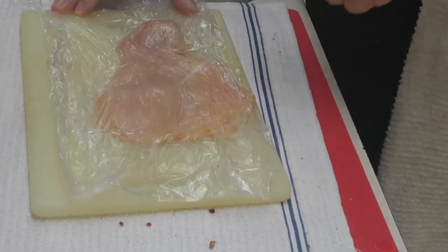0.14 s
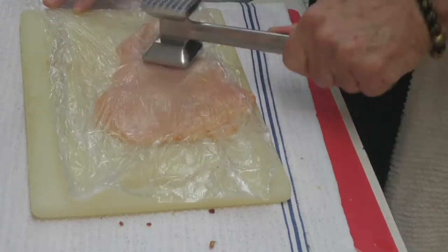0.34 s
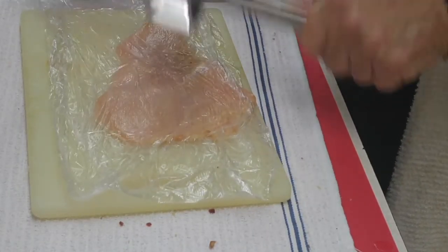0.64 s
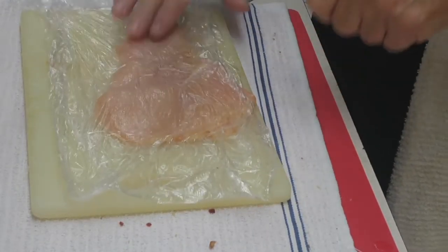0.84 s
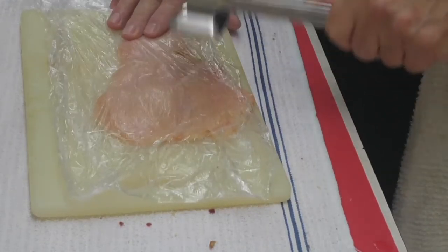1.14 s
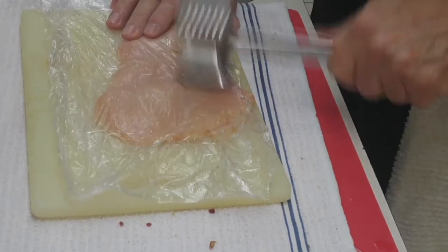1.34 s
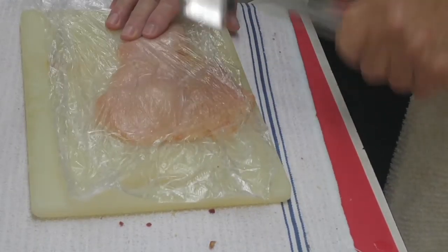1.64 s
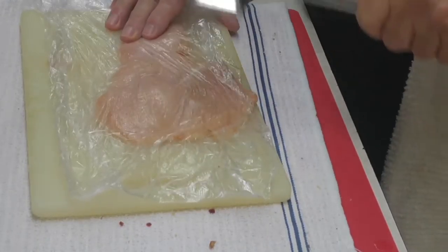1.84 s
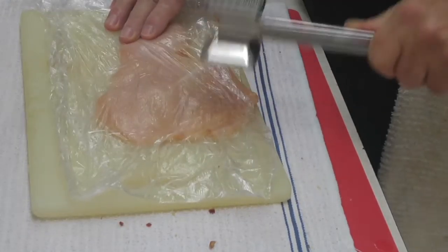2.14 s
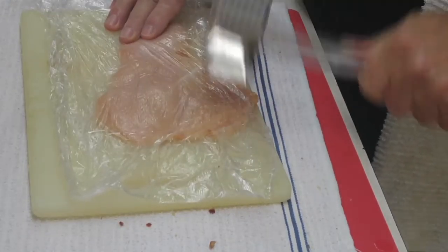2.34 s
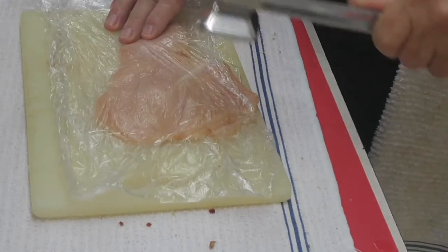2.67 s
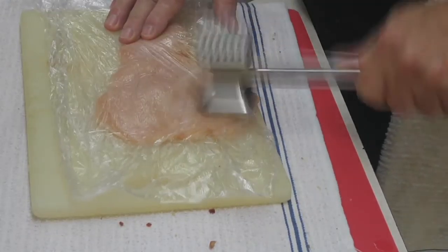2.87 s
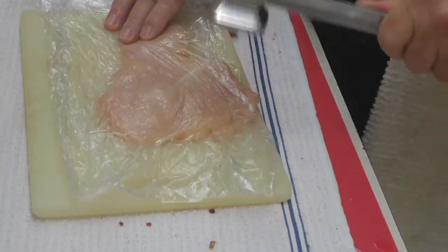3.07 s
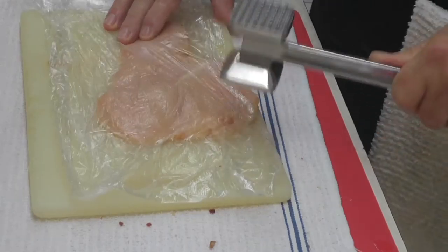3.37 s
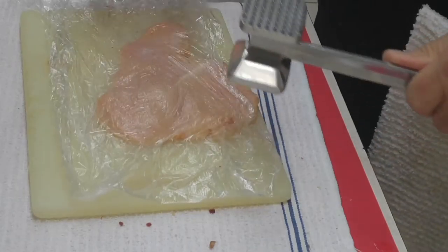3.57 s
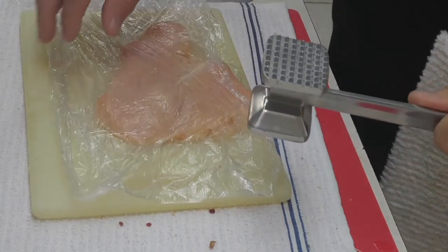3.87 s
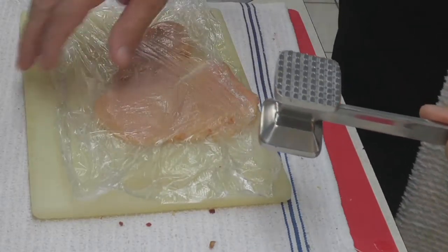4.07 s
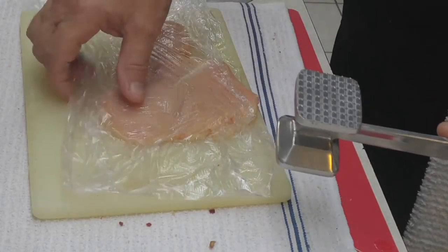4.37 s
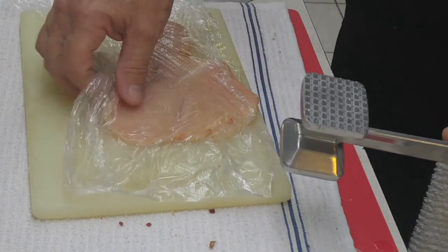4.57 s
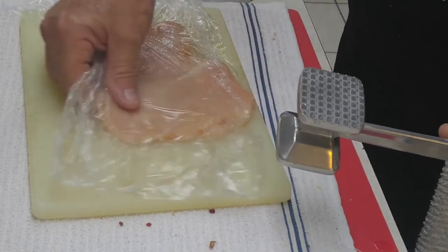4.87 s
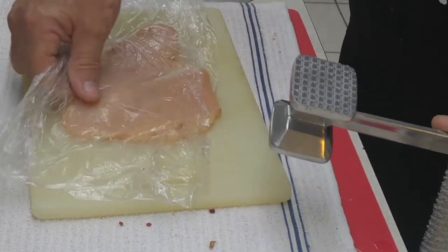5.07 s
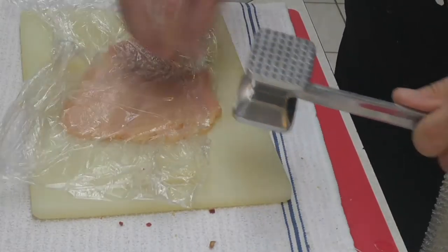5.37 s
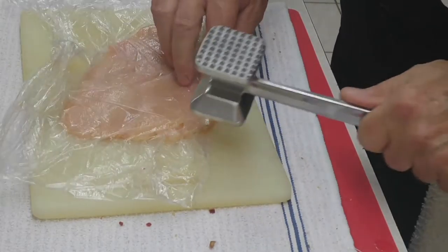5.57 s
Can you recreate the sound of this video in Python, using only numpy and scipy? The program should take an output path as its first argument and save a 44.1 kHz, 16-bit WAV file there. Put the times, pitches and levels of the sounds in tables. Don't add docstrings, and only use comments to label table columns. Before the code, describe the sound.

Steady wet whacks of a meat mallet, about three per second, each followed by crisp film crackle and short bright room ring.

```python
import sys
import numpy as np
from scipy import signal
from scipy.fft import rfft, irfft
from scipy.io import wavfile

SR = 44100
rng = np.random.default_rng(int(sys.argv[2]) if len(sys.argv) > 2 else 0)


def volts_from_decibels(level):
    exponent = np.asarray(level, float) / 20
    return 10 ** exponent


def to_wav(s):
    ch = np.atleast_2d(s).T
    pcm = np.round(np.clip(ch, -1, 1) * 32767)
    wavfile.write(sys.argv[1], SR, pcm.astype(np.int16))


N = 251987
PAD = SR // 4

# (time [s], slap level [dB], crack re slap [dB],
# room ring re slap [dB], thud level [dB])
BLOWS = [(-.11, -12, -10.5, -6, -65), (0.249, -5.5, -13, -10, -18), (0.6, -3, -8.5, -10.5, -11.5),
         (0.984, -14, -6, -14.5, -14), (1.344, -15.5, -9, -18, -21.5), (1.735, -11.5, -8.5, -13, -11.5),
         (2.096, -8.5, -14, -14.5, -13), (2.467, -8.5, -10.5, -14, -11.5), (2.792, -20.5, -7.5, -18.5, -21),
         (3.169, -16.5, -1.5, -16.5, -10.5), (3.53, -7, -15.5, -15, -10),
         (3.8645, -7.5, -9.5, -12.5, -13.5), (4.235, 9, -39, -6, -6.5), (4.593, -5, -5, -14.5, -14),
         (4.961, -7, -6.5, -15.5, -16), (5.298, 0.5, -6.5, -8, -10), (5.65, -9.5, -6, -16, -12.5)]
# (frequency [Hz], level [dB per Hz])
SIZZLE_SPECTRUM = [(3000, -22), (5500, -1), (7500, 0), (10000, -5.5), (13000, -13), (16000, -19)]


def rms_one(x):
    return x / np.sqrt(np.mean(x ** 2) + 1e-20)


def at_hz(points, hz, axis=1):
    points = np.array(points)
    return np.interp(np.log(hz + 1), np.log(points[:, 0]), points[:, axis])


def colour(x, spectrum):
    size = 2 ** 15
    log_gain = at_hz(spectrum, np.fft.rfftfreq(size, 1 / SR)) * np.log(10) / 20
    cepstrum = irfft(log_gain)
    cepstrum[1:size // 2] *= 2
    response = irfft(np.exp(rfft(cepstrum[:size // 2 + 1], size)))
    return signal.fftconvolve(x, response / np.linalg.norm(response))[:len(x)]


def time_line():
    return (np.arange(N + PAD) - PAD) / SR


def clicks(times, db):
    out = np.zeros(N + PAD)
    samples = np.round(np.asarray(times) * SR).astype(int) + PAD
    np.add.at(out, samples, volts_from_decibels(np.asarray(db)))
    return out


def shaped(train, shape):
    return signal.fftconvolve(train, shape)[:len(train)]


def ring(train, hz, t60):
    r, w = volts_from_decibels(-60 / (t60 * SR)), 2 * np.pi * hz / SR
    return signal.lfilter([0, np.sin(w)], [1, -2 * r * np.cos(w), r * r], train + 1e-18)


def fade(power, t60):
    return signal.lfilter([1], [1, -volts_from_decibels(-120 / (t60 * SR))], power + 1e-18)


def grit(per_s, spread_db):
    excess = np.minimum(rng.exponential(1, N + PAD), 4)
    sizes = volts_from_decibels(spread_db * excess) * rng.choice([-1, 1], N + PAD)
    return rms_one(sizes * (rng.random(N + PAD) < per_s / SR))


def flutter(rate):
    r = np.exp(-2 * np.pi * rate / SR)
    return rms_one(signal.lfilter([1], [1, -2 * r, r * r], rng.standard_normal(N + PAD)))


def through(s, axis):
    # (time [s], extra knock [dB], extra jolt and rumble [dB])
    thin_blows = [
        (0.983, 0, 2.5),
        (2.096, -1, 0.5),
        (2.466, -0.8, -2),
        (3.17, 9.5, 6),
        (3.865, 6.5, 10),
        (4.593, 0, -12),
        (4.96, 0.5, 6),
        (5.65, 1.5, 5.5),
    ]
    return sum(row[axis] * (np.abs(s - row[0]) < .05) for row in thin_blows)


def by_spot(s, count):
    spread_db = 3.0
    blow = np.searchsorted(s[1:] - .05, time_line())
    return volts_from_decibels(spread_db * rng.standard_normal((len(s), count)))[blow].T


def hush():
    # (frequency [Hz], level [dB per Hz])
    hush_spectrum = [(30, -24.5), (45, -10), (62, -0.5), (100, -23), (240, -17.5), (450, -21), (713, -17),
                     (2220, -29), (3300, -28.5), (9230, -33), (15200, -33)]
    return volts_from_decibels(-63) * rms_one(colour(rng.standard_normal(N + PAD), hush_spectrum))


def kitchen(feeds):
    # (frequency [Hz], early t60 [s], late t60 [s], late level [dB])
    decays = [(80, 0.18, 0.77, -30.5), (240, 0.17, 0.18, -9.5), (830, 0.26, 0.45, -13),
              (1640, 0.26, 0.39, -16), (3000, 0.25, 0.58, -21), (4900, 0.25, 0.35, -18),
              (7500, 0.25, 0.37, -35.5), (15000, 0.07, .25, -45)]
    out, white = 0, rng.standard_normal((2, N + PAD))
    edges = 50 * 2 ** np.arange(0, 8.5, 1 / 3)
    grid = np.linspace(10, SR / 2, 2000)
    rise = np.exp(-1 / (0.0027 * SR))
    lumps = volts_from_decibels(0.54 * flutter(90))
    for k, (low, high) in enumerate(zip(edges, edges[1:])):
        hz = np.sqrt(low * high)
        power = 0
        for train, tone in feeds:
            share = volts_from_decibels(2 * at_hz(tone, hz)) / np.mean(volts_from_decibels(2 * at_hz(tone, grid)))
            power = power + train ** 2 * share
        early = fade(power, at_hz(decays, hz))
        late = volts_from_decibels(2 * at_hz(decays, hz, axis=3)) * fade(power, at_hz(decays, hz, axis=2))
        power = signal.lfilter([1 - rise], [1, -rise], early + late)
        patches = volts_from_decibels(1.8 * flutter(9.9))
        band = signal.butter(2, [low, high], "band", fs=SR, output="sos")
        out = out + patches * np.sqrt(power) * signal.sosfilt(band, white[k % 2])
    return out * lumps


def fingers():
    # (loudest time [s], level [dB], swell [dB/s], dying [dB/s], run-up [s])
    slides = [
        (.105, -43.5, 268, 86, 0.21),
        (.56, -51, 332.5, 200.5, .1),
        (2.392, -61.5, 62, 396, 0.17),
        (4.2, -52.5, 28, 303, 0.16),
        (4.227, -52.5, 60, 2999.5, 0.029),
    ]
    # (frequency [Hz], level [dB per Hz])
    hiss = [(1200, 0.5), (2400, 3), (3200, 2.5), (5000, -4), (7000, -17), (9000, -25), (11000, -24)]
    squeak = [(600, -10.5), (775, 7.5), (1100, -9), (2500, -10.5), (2890, -6.5), (3250, -17.5),
              (4700, -21.5), (6000, -28), (8300, -17), (9160, -18.5), (9700, -30.5)]
    chirp = [(1800, -32), (2600, -18.5), (2850, -7.5), (3050, -16.5), (4300, -28), (4600, -13.5),
             (5000, -33.5), (8000, -54.5)]
    t, out = time_line(), 0
    for (s, db, swell, dying, lead), tone in zip(slides, [hiss, hiss, hiss, squeak, chirp]):
        fall_db = np.where(t < s, swell * (s - t), dying * (t - s))
        level = volts_from_decibels(db - fall_db) * (t > s - lead)
        out = out + level * colour(grit(10000, spread_db=-3.5), tone)
    return out


def peeling(peels):
    lead_s, t60_s = .006, 0.055
    t, swell = time_line(), 0
    for s, db in peels:
        fall_db = np.where(t < s, 26 * (s - t) / lead_s, 60 * (t - s) / t60_s)
        swell = swell + volts_from_decibels(db - 9.5 - fall_db - 4.0 * (t < s))
    return swell * (grit(16000, spread_db=2.0) + 0.5 * grit(410, spread_db=3.0))


def fretting():
    # (frequency [Hz], level [dB per Hz])
    fret_spectrum = [(2000, -28.5), (6000, -11), (10000, -3.5), (14000, 1.5), (16000, -1.5)]
    cling_s, sag_db_per_s = 0.086, 60
    s, slap_db, crack_db, wet_db, _ = np.transpose(BLOWS)
    rest = np.arange(int(.2 * SR)) / SR
    cling_db = .9 * (slap_db + wet_db) + .25 * crack_db - 27
    easing = volts_from_decibels(-sag_db_per_s * rest - 500 * np.maximum(rest - cling_s, 0))
    cling = shaped(clicks(s, cling_db), easing)
    return colour(cling * grit(12000, spread_db=4.0), fret_spectrum)


def film():
    # (time [s], peak level [dB])
    peels = [(0.325, -18.5), (0.679, -17), (1.0631, -28.5), (1.4309, -22.5), (1.8211, -23), (2.1736, -42),
             (2.1826, -14.5), (2.1977, -23.5), (2.5406, -29.5), (2.5595, -15), (2.5757, -28.5),
             (2.8774, -31.5), (3.255, -21), (3.595, -44), (3.6078, -22.5), (3.9494, -31), (4.315, -15),
             (4.648, -24), (4.672, -26), (4.692, -29.5), (5.0447, -16.5), (5.3797, -18)]
    # (time [s], peak level [dB])
    snap_events = [(2.174, -28), (2.193, 3.5), (2.2004, -6), (2.2044, -19), (2.5401, -23), (2.5581, -25),
                   (2.573, -27), (2.5793, -34), (3.5934, -33), (3.6026, -38), (3.6174, -34.5),
                   (3.6294, -37), (4.4816, -30.5), (4.6723, -28), (4.7044, -45), (5.0404, -32)]
    # (time [s], peak level [dB])
    graze_events = [
        (4.5772, -23.5),
    ]
    # (frequency [Hz], level [dB per Hz])
    crackle_spectrum = [(400, -2.5), (700, 5.5), (1500, -9), (2400, -7), (4000, -7.5), (7000, -9),
                        (14000, -13), (17000, -20)]
    short = np.exp(-np.arange(200) / SR / .00015) * rng.standard_normal(200)
    snaps = volts_from_decibels(-6.0) * colour(shaped(clicks(*np.transpose(snap_events)), short), SIZZLE_SPECTRUM)
    scrape = np.exp(-np.arange(900) / SR / .002) * rng.standard_normal(900)
    graze = shaped(clicks(*np.transpose(graze_events)), scrape)
    graze = signal.sosfilt(signal.butter(3, [2600, 7000], "band", fs=SR, output="sos"), graze)
    crackle = peeling(peels) + snaps
    sound = colour(crackle, crackle_spectrum) + graze + fretting()
    return sound, [(volts_from_decibels(-42.5) * crackle, crackle_spectrum)]


def counter():
    # (frequency [Hz], level [dB], t60 [s])
    slab_modes = [(98.6, 2.5, 0.12), (150, -6.5, 0.2), (210.6, -12, 0.036), (280, -4.5, 0.059),
                  (313, -11.5, 0.13), (360, -17, 0.039)]
    # (frequency [Hz], level [dB per Hz])
    rumble_spectrum = [(50, -16), (90, -4.5), (150, 3.5), (300, -4.5), (420, -6), (700, -36.5), (2000, -68)]
    s, slap_db, crack_db, wet_db, thud_db = np.transpose(BLOWS)
    extra_db, spot = through(s, axis=2), by_spot(s, count=len(slab_modes))
    s = s + .0185
    jolt_db = thud_db - 6.5 + 0.045 * crack_db + extra_db
    rumble_db = 0.55 * (slap_db + wet_db) - 29.5 + 0.43 * extra_db
    soft = np.hanning(70) / 35
    spring = shaped(clicks(s - .0017, thud_db - 9.0), soft)
    jolt = shaped(clicks(s - .0155, jolt_db - 1) + clicks(s - .0122, jolt_db - 6), soft)
    dip = shaped(clicks(s - .0041, thud_db + 2.5), np.hanning(130))
    modes = 0
    for gain, (hz, db, t60) in zip(spot, slab_modes):
        drive = spring + jolt * min(hz / 280, 1) ** 4
        modes = modes + volts_from_decibels(db) * ring(gain ** .3 * drive, hz, t60)
    return modes - dip, [(clicks(s - .006, rumble_db + 18), rumble_spectrum)]


def mallet():
    # (frequency [Hz], level [dB], t60 [s])
    board_modes = [(603, -8.5, 0.26), (776, -22, 0.29), (866.5, 5, 0.08), (898, -4.5, .09),
                   (1164, -6, 0.14), (1270, 7.5, 0.05), (1770, 2, 0.055)]
    # (frequency [Hz], level [dB per Hz])
    knock_spectrum = [(350, -19.5), (520, -24.5), (640, -7), (900, -6.5), (1100, -11.5), (1600, -13),
                      (4000, -35.5)]
    slap_spectrum = [(500, -34), (900, -15.5), (1300, -4), (1800, -2.5), (2600, -6.5), (3600, -8),
                     (5000, -15.5), (10000, -39)]
    crack_spectrum = [(2000, -8), (3200, 0), (4500, -1), (6500, 3), (8500, -3.5), (12000, -12),
                      (15000, -14), (17000, -49)]
    film_ring_spectrum = [(2200, -22), (3300, -4.5), (4200, -1), (5000, -2), (6200, -11), (7500, -13),
                          (12000, -39)]
    quiver_spectrum = [(1200, -24.5), (1900, -9.5), (2800, -9), (4100, -8.5), (4800, 2.5), (5600, -4.5),
                       (6600, -13), (8000, -28)]
    # (time [s], level [dB])
    quivers = [
        (-.11, -70.5),
        (0.601, -58),
        (4.591, -52.5),
        (5.299, -48.5),
    ]
    squash_s, quiver_t60_s = 0.0034, 0.27
    s, slap_db, crack_db, wet_db, _ = np.transpose(BLOWS)
    s, wet = s - .001, slap_db + wet_db
    knock_db = 0.61 * wet - 7 + through(s, axis=1)
    t = np.arange(int(.06 * SR)) / SR
    squash = (1 - np.exp(-t / 0.00031)) * np.exp(-np.maximum(t - squash_s, 0) / 0.004)

    def burst(db, source, spectrum):
        return colour(shaped(clicks(s, db), squash) * source, spectrum)

    air, film_grit = rng.standard_normal((2, N + PAD)), grit(9000, spread_db=5.0)
    knock = burst(knock_db + 7.5, air[0], knock_spectrum)
    slap = burst(slap_db - 4.0, air[1], slap_spectrum)
    crack = burst(slap_db + crack_db + 3.5, film_grit, crack_spectrum)
    spot, board = by_spot(s, count=len(board_modes)), 0
    for k, (hz, db, t60) in enumerate(board_modes):
        board = board + volts_from_decibels(db - 43.5) * (-1) ** k * ring(spot[k] * (knock + slap), hz, t60)
    quiver = np.sqrt(fade(clicks(*np.transpose(quivers)) ** 2, quiver_t60_s))
    feeds = [(clicks(s + 0.0019, knock_db + wet_db + 12.0), knock_spectrum),
             (clicks(s + 0.0047, wet - 3), slap_spectrum),
             (clicks(s + 0.0008, wet + 1.3 * crack_db + 2.0), film_ring_spectrum),
             (clicks(s + .003, wet + 0.21 * crack_db - 10.5), SIZZLE_SPECTRUM),
             (quiver, quiver_spectrum)]
    return knock + slap + crack + board, feeds


def scene():
    sounds, feeds = zip(mallet(), counter(), film())
    mix = sum(sounds) + fingers() + kitchen(sum(feeds, [])) + hush()
    return mix[None, PAD:]


def low_pass(x):
    return signal.sosfilt(signal.butter(12, 16960, fs=SR, output="sos"), x)


def record(dry):
    limit_db, attack_s, release_db_per_s, ceiling = 2.5, 0.0017, 105.5, .87
    x = signal.lfilter(*signal.iirnotch(505, 4.0, fs=SR), dry[0])
    x = signal.sosfilt(signal.butter(3, 60, "high", fs=SR, output="sos"), x)
    fall_db = release_db_per_s * np.arange(N) / SR
    over_db = np.maximum(20 * np.log10(np.abs(x) + 1e-9) - limit_db, 0)
    held_db = np.maximum(np.maximum.accumulate(over_db + fall_db) - fall_db, 0)
    grip = np.exp(-1 / (attack_s * SR))
    x = x * volts_from_decibels(-signal.lfilter([1 - grip], [1, -grip], held_db))
    x = ceiling * x / (1 + (np.abs(x) / ceiling) ** 4) ** .25
    x = signal.sosfilt(signal.cheby2(8, 40, 16700, fs=SR, output="sos"), x) - .0007
    return low_pass(x[None])


dry = scene()
out = record(dry)
to_wav(out)
```